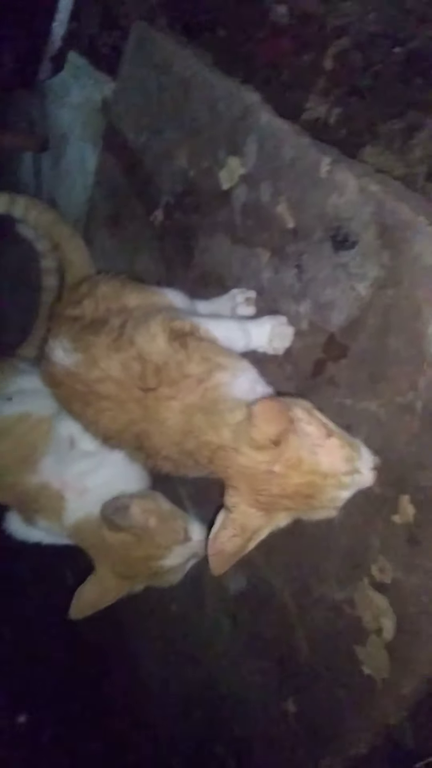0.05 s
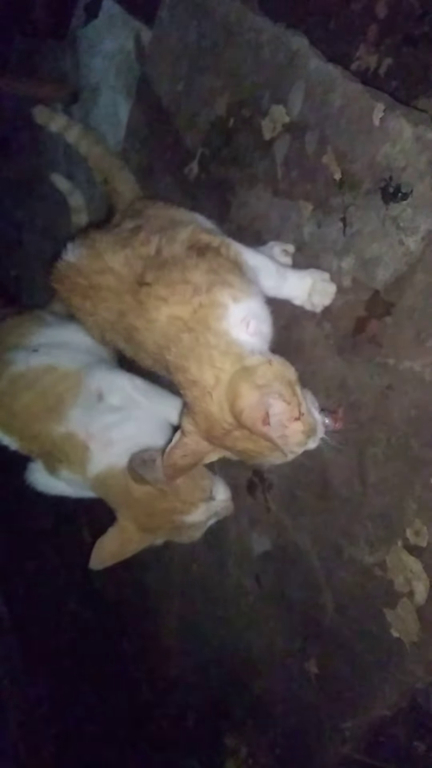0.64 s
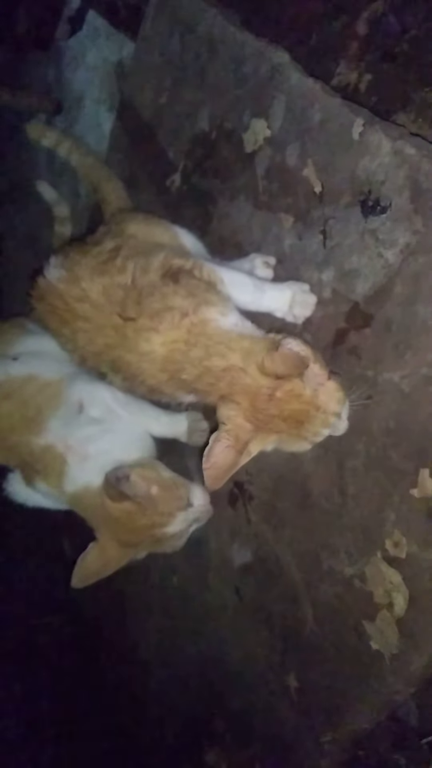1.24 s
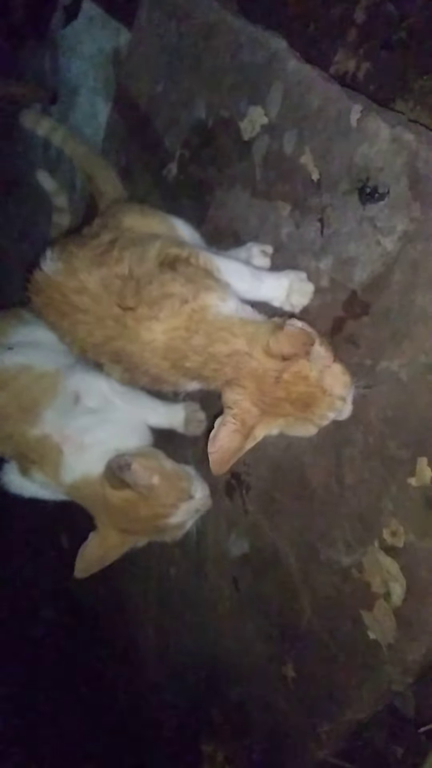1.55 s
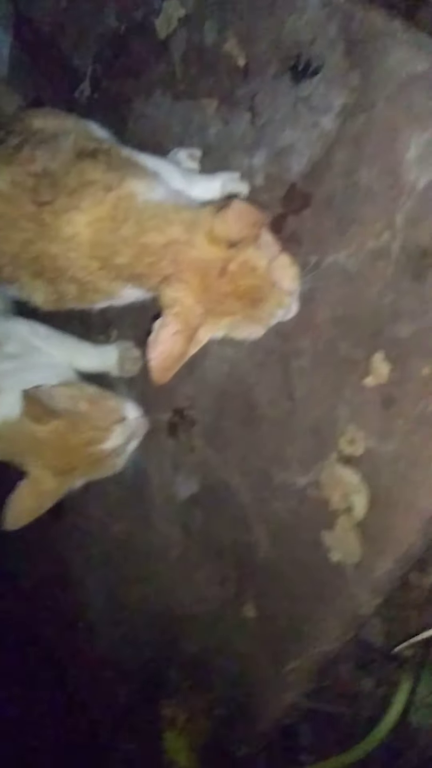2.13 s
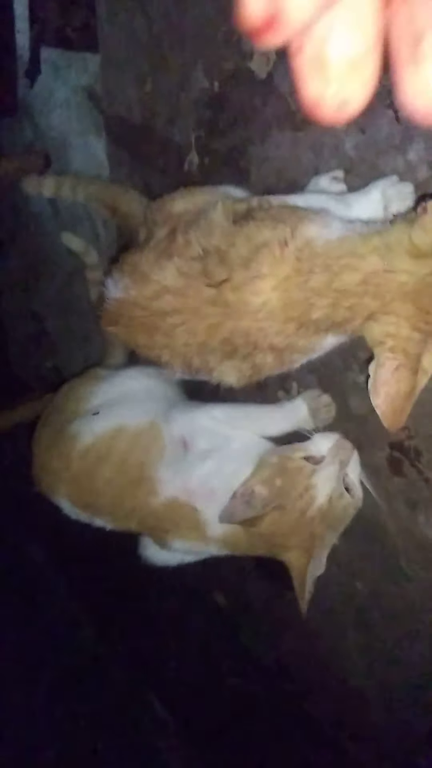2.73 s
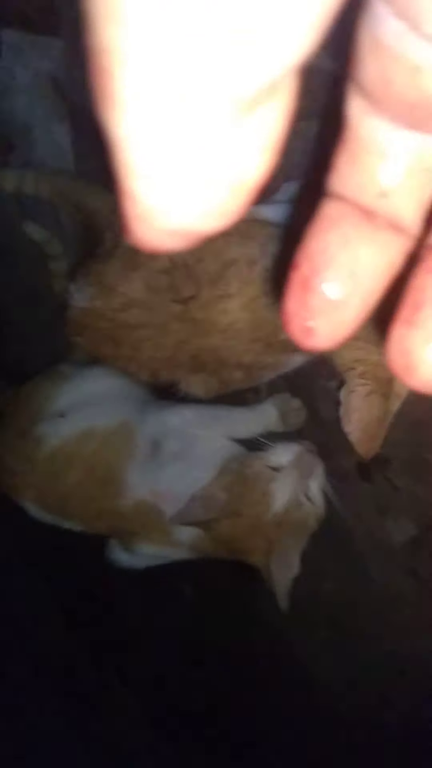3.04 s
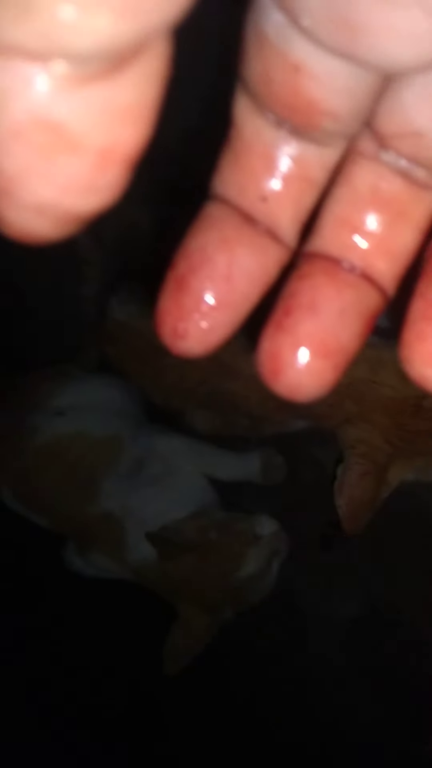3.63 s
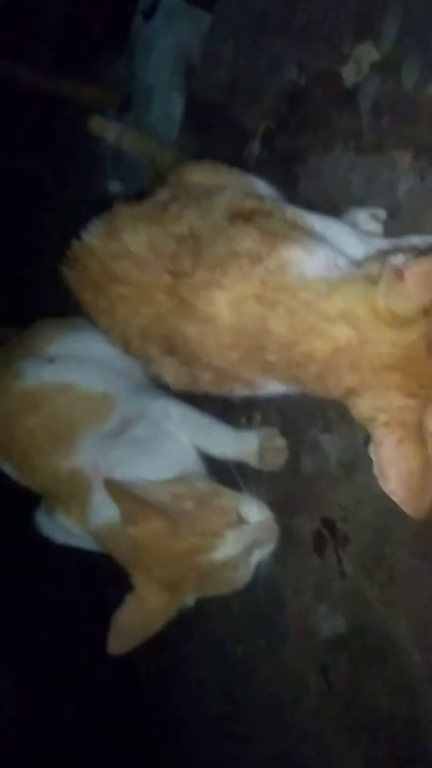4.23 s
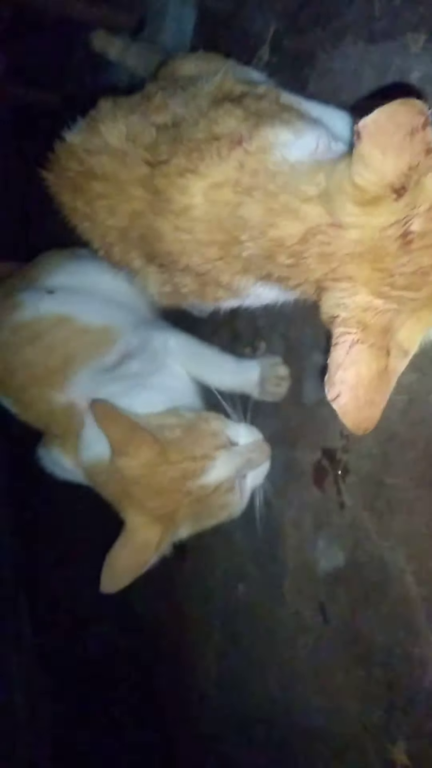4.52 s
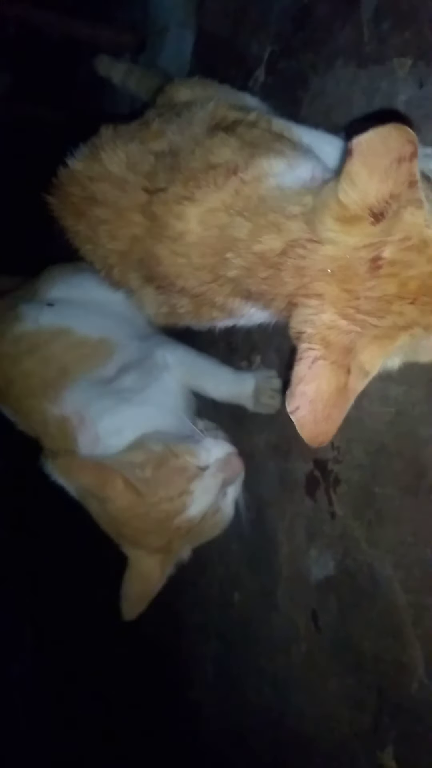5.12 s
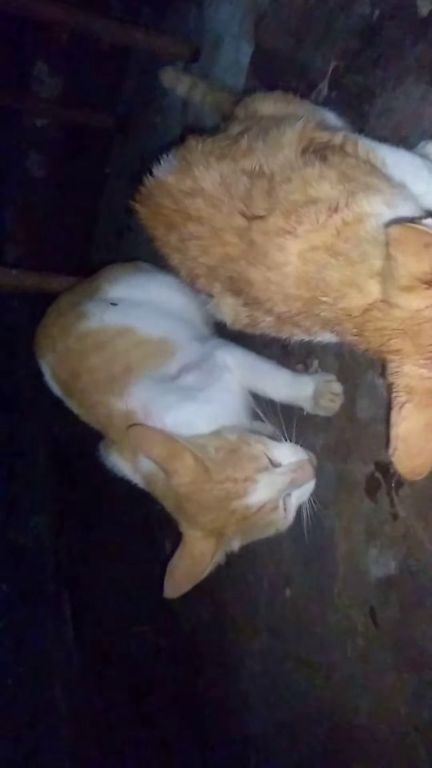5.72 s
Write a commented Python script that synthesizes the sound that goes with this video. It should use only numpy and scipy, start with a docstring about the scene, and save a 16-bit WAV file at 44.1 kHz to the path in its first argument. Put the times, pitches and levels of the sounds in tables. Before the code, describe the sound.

Outdoors at night, a high cricket chirps about nine times a second throughout, over soft air and faint hiss. Close to the phone's microphone, two cats lick and chew with tiny, irregular wet clicks and smacks, one clear at 0.2 seconds and more from 1.4 seconds on. Faint, distant two-note hoots sound in the first second and at 2.4 seconds. Short low gulps come around 1.8 and 2.7 seconds. From 2.9 to 3.1 seconds, fingers knock sharply and scuff on the phone, the loudest moment. More taps and dull, gritty rubs with a low rumble follow from 3.8 to 4.1 seconds, with a brief skin squeak near 4 seconds. From 3.9 seconds a second insect adds thin, falling ticks. Both insects grow fainter near 5 seconds, while scattered licks continue until the end, just before 6 seconds. The sound is wide in stereo.

```python
"""Outdoors at night, two cats lick and chew food from a hand close to a phone: tiny wet clicks ring in
their mouths. A cricket scrapes its wings about nine times a second, over soft air and faint far hoots.
Fingers knock, rub and squeak on the phone, and a second insect joins in with thin falling ticks.
The right channel is slightly delayed and upside down, which widens the sound.
The phone's noise suppressor lowers the quiet moments."""
import sys
import numpy as np
from scipy import signal
from scipy.fft import rfft, irfft
from scipy.io import wavfile
from scipy.ndimage import uniform_filter1d

SR = 44100
rng = np.random.default_rng(int(sys.argv[2]) if len(sys.argv) > 2 else 0)


def generate_wav(signal):
    """Clip the signal to [-1, 1] and save it as 16-bit WAV at the path in sys.argv[1]."""
    frames = np.transpose(np.atleast_2d(signal))
    scaled = np.clip(frames, -1, 1) * 32767
    pcm = np.round(scaled).astype(np.int16)
    wavfile.write(sys.argv[1], SR, pcm)


N = 254456

# strokes of skin on the phone: peak t/s, level/dB, rise/s, fall/s, grit relative to the stroke/dB
# (rise and fall are the times to grow or fade by a factor of about 2.7)
RUBS = [(2.905, -27.5, 0.0031, 0.021, -19.5), (3.048, -28, 0.0074, 0.025, -8),
        (3.069, -24, 0.0053, 0.0023, 2), (3.761, -25.5, 0.0092, 0.0093, -10),
        (3.781, -17, .014, 0.012, -13.5), (3.878, -21, .015, 0.013, -37), (3.997, -27.5, 0.0029, 0.031, -8),
        (4.027, -25.5, 0.024, 0.023, -13), (4.201, -62.5, 0.031, 0.044, 16.5)]


def undb(db):
    """Turn decibels into a factor to multiply by."""
    return 10 ** (np.asarray(db) / 20)


def unit(x):
    """Scale x to an average strength (rms) of 1."""
    return x / np.sqrt(np.mean(x ** 2) + 1e-20)


def seconds(length):
    """The time of each sample in a short sound."""
    return np.arange(int(length * SR)) / SR


def curve(points, s):
    """Read a curve of (time, value) points at the times s."""
    return np.interp(s, *np.transpose(points))


def add(out, s, x):
    """Mix x into out from time s on."""
    i = int(round(s * SR))
    x = x[..., max(-i, 0):out.shape[-1] - i]
    out[..., max(i, 0):max(i, 0) + x.shape[-1]] += x


def band(x, hz, octaves):
    """Keep the frequencies in a band around hz."""
    edges = np.clip([hz / 2 ** (octaves / 2), hz * 2 ** (octaves / 2)], 20, SR / 2 - 500)
    return signal.sosfilt(signal.butter(2, edges, "bandpass", fs=SR, output="sos"), x)


def colour(x, points):
    """Shape the bass and treble of x with (f/Hz, level/dB) points, at strength 1."""
    hz, db = np.transpose(points)
    f = np.maximum(np.fft.rfftfreq(x.shape[-1], 1 / SR), 1)
    gain = undb(np.interp(np.log(f), np.log(hz), db))
    return unit(irfft(rfft(x) * gain, x.shape[-1]))


def walk(rate):
    """A smooth random wander of size about 1, turning rate times a second."""
    hold = max(int(SR / rate), 1)
    steps = np.repeat(rng.standard_normal(N // hold + 1), hold)
    return unit(uniform_filter1d(steps, hold)[:N])


def grains(n, rate, spread_db):
    """Random tiny clicks of very unequal size, about rate a second."""
    hits = rng.random(n) < rate / SR
    return hits * rng.standard_normal(n) * undb(spread_db * rng.standard_normal(n))


def glide(length, start_hz, end_hz):
    """A tone that swells and fades while its pitch slides."""
    n = len(seconds(length))
    cycles = np.cumsum(np.linspace(start_hz, end_hz, n)) / SR + rng.random()
    return np.sqrt(np.hanning(n)) * np.sin(2 * np.pi * cycles)


def widen(x, lag_ms=.447):
    """Make wide stereo: the right channel is slightly shifted in time and upside down."""
    i = np.arange(len(x))
    shifted = np.interp(i - np.round(lag_ms * SR / 1000), i, x, left=0, right=0)
    return np.array([x, -shifted])


def echoes(x, t60, wet_db, channels=2):
    """Dense echoes from ground, walls and leaves; they fade by 60 dB in t60 seconds."""
    t = seconds(t60)
    tail = rng.standard_normal((channels, len(t))) * np.exp(-np.log(1000) * t / t60)
    tail = unit(tail * (1 - np.exp(-t / .0015))) / np.sqrt(len(t))
    return undb(wet_db) * signal.fftconvolve(x[None], tail, axes=1)[:, :len(x)]


def night(air_db=-65, hiss_db=-72, trill_hz=2970, trill_db=-80, chorus_hz=7280, chorus_db=-75):
    """Soft outdoor air, the blurred trills of far insects, and microphone hiss."""
    # tone colours of the air and the hiss: f/Hz, level/dB
    air_colour = [(40, -11.5), (100, 12), (250, 3), (600, -3), (1200, -9), (2000, -7), (3000, -13.5),
                  (4000, -10.5), (5500, -17), (9000, -23), (15000, -20)]
    hiss_colour = [(100, 2.5), (1000, -15), (5000, -.5), (10000, -3), (15000, -5.5)]
    air = undb(air_db + walk(5)) * colour(rng.standard_normal(N), air_colour)
    trill = undb(trill_db + 3.5 * walk(18)) * unit(band(rng.standard_normal(N), trill_hz, .1))
    chorus = undb(chorus_db + 3 * walk(25)) * unit(band(rng.standard_normal(N), chorus_hz, .07))
    hiss = undb(hiss_db) * colour(rng.standard_normal((2, N)), hiss_colour)
    return widen(air + trill + chorus) + hiss


def hand_rumble(hz=88, octaves=.98, rest_db=-65, shake_db=-37, brace_s=.024, settle_s=.1, left_db=1):
    """The gripping hand shakes the phone a little all the time, and more around each rub."""
    t = np.arange(N) / SR
    shake = sum(undb(db + shake_db) * np.exp(-np.maximum((s - t) / brace_s, (t - s) / settle_s))
                for s, db, *_ in RUBS)
    rumble = (undb(rest_db) + shake) * unit(band(rng.standard_normal(N), hz, octaves))
    return widen(rumble) * undb([[left_db], [-left_db]])


def hoots(gain_db=-1, hoot_s=.082, pitch_drop=.041):
    """Soft far calls of two nearly pure notes, the second lower, blurred by their echoes."""
    # far calls: t/s, pitch/Hz, level/dB, delay of the second note/s
    calls = [(-.03, 778, -64, 0.082), (.44, 528, -63.5, 0.071), (.797, 1325, -72.5, 0.0706),
             (2.362, 816.5, -62, 0.11)]
    dry = np.zeros(N)
    for s, hz, db, delay in calls:
        for start, pitch in [(s, hz), (s + delay, hz * (1 - pitch_drop))]:
            add(dry, start, undb(db + gain_db) * glide(hoot_s, pitch * 1.008, pitch * .992))
    dry *= 1 + walk(120)
    return widen(dry) + echoes(dry, t60=.25, wet_db=1)


def cricket_rhythm(first_s=.0068, uneven_db=1.1):
    """List the cricket's chirps as (t/s, level/dB), each a little louder or softer by chance."""
    # the cricket's tempo: t/s, rate/(chirps a second)
    tempo = [(0.0, 8.87), (0.55, 8.94), (0.9, 8.71), (1.15, 8.9), (2.3, 8.73), (2.7, 9.1), (3.1, 8.54),
             (4.0, 9.1), (4.3, 9.13), (4.8, 8.9), (5.77, 8.91)]
    # its loudness as the phone turns and the hand shades it: t/s, level/dB
    loudness = [(0, -50), (.3, -47), (.9, -50), (1.75, -46.5), (2.28, -57.5), (2.9, -55), (3.1, -57.5),
                (3.64, -60), (3.88, -53.5), (4.55, -50.5), (4.86, -64.5), (5.35, -60), (5.77, -59.5)]
    chirps, s = [], first_s
    while s < N / SR:
        chirps.append((s, curve(loudness, s) + uneven_db * rng.standard_normal()))
        s += 1 / curve(tempo, s)
    return chirps


def cricket(high_hz=7480, low_hz=6740, gain_db=-7, undertone_hz=2950, undertone_db=-29, clear_db=-47):
    """A wing scrapes a row of teeth and slows, so its tone falls; echoes smear strokes into a chirp."""
    # wing strokes of one chirp: t within the chirp/s, length/s, level/dB
    strokes = [(-.0245, 0.011, -3), (-.0105, .01, -6), (-.003, 0.0074, 5), (.004, 0.013, -5)]
    out = np.zeros((2, N))
    lead_s = .04  # room for the early strokes
    for s, db in cricket_rhythm():
        wings = np.zeros(SR // 2)
        for start, length, stroke_db in strokes:
            detune = 1 + .006 * rng.standard_normal()
            tone = glide(length, high_hz * detune, low_hz * detune)
            undertone_gain = undb(undertone_db + 3 * rng.standard_normal())
            undertone = undertone_gain * glide(length, undertone_hz * 1.07, undertone_hz * .93)
            add(wings, lead_s + start, undb(stroke_db + 1.2 * rng.standard_normal()) * (tone + undertone))
        # when the straight path is shaded, more of the weaker chirp is echo
        shade_db = np.clip((clear_db - db) / 2, 0, 5)
        wings += echoes(wings, t60=.11, wet_db=shade_db - 7, channels=1)[0]
        chirp = widen(wings) + echoes(wings, t60=.15, wet_db=-11)
        add(out, s - lead_s, undb(db + gain_db) * unit(chirp))
    return out


def chewing(mouth_hz=3400, octaves=1.6, bite_db=3, gain_db=-1):
    """Many tiny wet clicks ring in the mouth, swelling unevenly with the jaw."""
    # loudness of the soft chewing: t/s, level/dB
    loudness = [(0, -60), (.2, -90), (1.3, -87), (2.1, -71), (2.38, -60), (2.53, -69.5), (2.83, -57),
                (3.25, -80.5), (4.5, -76), (5, -68.5), (5.77, -80)]
    clicks = grains(N, rate=3000, spread_db=4)
    jaw = undb(curve(loudness, np.arange(N) / SR) + gain_db + bite_db * walk(25))
    dry = jaw * unit(band(clicks, mouth_hz, octaves))
    return widen(dry) + echoes(dry, t60=.11, wet_db=-12)


def licks_and_skin(rasp_db=-25, crackle_db=-84):
    """Ringing bursts of clicks with a rasp: saliva snaps on a rough tongue, or skin rubs the phone."""
    # licks and smacks, plus a skin squeak (3.981 s) and a hollow rub (4.189 s) on the phone:
    # t/s, peak level/dB, fade time/s, ring/Hz, band width/octaves
    bursts = [(.047, -48.5, 0.0049, 1900, 1.2), (0.24, -37.5, 0.011, 4700, 0.6),
              (0.342, -50.5, 0.0084, 8930, 0.15), (1.36, -53.5, 0.076, 2410, 0.22),
              (1.562, -47.5, 0.025, 4180, 0.63), (1.583, -48.5, 0.009, 4000, .45),
              (1.6, -52.5, .04, 3770, 1.3), (1.705, -45, 0.02, 2920, 3.4), (1.856, -50.5, 0.025, 3000, 1.9),
              (2.157, -48, 0.0016, 2530, .38), (2.179, -42.5, 0.0014, 2300, 0.39),
              (2.284, -46, 0.0077, 2900, 1), (2.374, -49, .0026, 2880, 1.15),
              (2.409, -43, 0.0028, 4780, 0.38), (2.446, -38.5, 0.0056, 2210, 1.16),
              (2.596, -51, 0.025, 4500, 1.4), (2.763, -41.5, 0.021, 2120, 0.69),
              (2.773, -50.5, 0.0089, 4340, 1.5), (3.219, -50, 0.022, 2920, 0.88),
              (3.31, -48, 0.012, 4100, 1.3), (3.405, -46.5, 0.0032, 2140, 0.22),
              (3.446, -47, 0.0081, 2500, 0.14), (3.551, -38, 0.013, 3480, 0.67),
              (3.981, -28, .006, 3000, 0.97), (4.189, -49, 0.028, 867, 0.22),
              (4.443, -49.5, 0.0036, 4730, 0.45), (4.556, -47, 0.039, 3100, 1.24),
              (5.146, -44.5, .014, 1852, 0.57), (5.414, -59.5, 0.048, 1946, 0.81),
              (5.526, -55.5, 0.0093, 675, 0.89), (5.727, -44.5, 0.0051, 8800, 0.58),
              (5.73, -51, 0.02, 3330, 0.88)]
    dry = np.zeros(N)
    t = seconds(.3) - .1  # zero at the peak of a burst
    for s, db, fade_s, hz, octaves in bursts:
        swell = np.exp(np.where(t < 0, t / (.15 * fade_s), -t / fade_s))
        snaps = swell * grains(len(t), rate=2600, spread_db=6)
        snaps[np.argmin(np.abs(t))] = 1.7 * np.abs(snaps).max()  # one main snap stands out
        rasp = undb(rasp_db) * np.exp(-np.abs(t) / .011) * grains(len(t), rate=4000, spread_db=5)
        burst = band(snaps + rasp, hz, octaves)
        peak = np.sqrt(uniform_filter1d(burst ** 2, size=90).max())
        add(dry, s + t[0], undb(db) * burst / peak)
    # a faint wet crackle goes on between the licks
    crackle = grains(N, rate=60, spread_db=6)
    dry += undb(crackle_db + 3 * walk(2.3)) * unit(band(crackle, hz=4300, octaves=1.3))
    return widen(dry) + echoes(dry, t60=.11, wet_db=-12)


def gulps(gain_db=4, waver=.19):
    """Swallowing makes short, low, unsteady tones in a cat's throat."""
    # swallows: t/s, length/s, pitch/Hz, level/dB
    swallows = [(1.784, 0.022, 241.6, -54), (1.915, 0.041, 222.4, -60.5), (2.668, 0.069, 209, -43.5),
                (2.746, 0.05, 207, -51)]
    dry = np.zeros(N)
    for s, length, hz, db in swallows:
        n = len(seconds(length))
        phase = 2 * np.pi * np.cumsum(hz * (1 + waver * walk(251)[:n])) / SR
        tone = np.sin(phase) + .018 * np.sin(2 * phase)
        add(dry, s, undb(db + gain_db) * np.sqrt(np.hanning(n)) * tone)
    return widen(dry)


def knocks(snap_db=-22):
    """A fingertip makes the case ring; a shorter touch clicks more sharply, with more snap of skin."""
    # finger taps: t/s, peak level/dB, contact time/ms, lag of the right channel/ms
    taps = [(2.896, -39.5, .5, 0.48), (2.9006, -25, 1.3, 0.58), (2.926, -3.5, 0.38, -0.39),
            (3.0152, -19.5, 0.24, 0.42), (3.0582, -12, 1.87, 0.47), (3.068, -10, 3.6, 0.41),
            (3.0689, -8.5, 0.02, 0.5), (3.782, -19.5, .3, 0.81), (3.8237, -27.5, .2, 0.38),
            (3.9231, -22, .5, 0.44), (4.087, -31, .4, 0.61)]
    # ringing tones of the phone's case: f/Hz, time to fade by 60 dB/s, level/dB
    case_tones = [(189, 0.026, -22), (600, 0.0052, -5.5), (1450, 0.0025, 5.5), (3365, 0.0013, -5),
                  (5640, 0.004, 7.5)]
    out, t = np.zeros((2, N)), seconds(.03)
    ring = sum(undb(db) * np.sin(2 * np.pi * hz * t) * np.exp(-np.log(1000) * t / t60)
               for hz, t60, db in case_tones)
    pad = SR // 500
    for s, db, contact_ms, lag_ms in taps:
        push = np.hanning(int(contact_ms * SR / 1000) + 3)
        knock = np.pad(np.convolve(ring, push), pad)
        # the case springs back, so a push leaves no lasting pressure
        knock = signal.sosfilt(signal.butter(1, 260, "highpass", fs=SR, output="sos"), knock)
        knock /= np.abs(knock).max()
        snap = band(rng.standard_normal(len(t)) * np.exp(-t / .0005), hz=7000, octaves=1.6)
        add(knock, pad / SR, undb(snap_db) * snap / (1 + contact_ms ** 2))
        add(out, s - pad / SR, widen(-undb(db) * knock, lag_ms))
    return out


def rubs(body_db=-1, left_db=1):
    """Skin sticks and slips on the case: a dull run of slips with fine grit on top."""
    # tone colour of the dull slips: f/Hz, level/dB
    slip_colour = [(40, -21), (100, 1), (200, -2), (420, 0), (700, -8.5), (1200, -12.5), (1700, -13.5),
                   (2800, -16), (4500, -26), (7500, -34.5), (11000, -48), (15000, -46.5)]
    # tone colour of the fine grit: f/Hz, level/dB
    grit_colour = [(600, -19.5), (1500, -11.5), (2900, -6.5), (5000, -9.5), (7500, -10.5), (11000, -22),
                   (15500, -28)]
    t = np.arange(N) / SR
    slip_power, grit_power = np.zeros(N), np.zeros(N)
    for s, db, rise, fall, grit_db in RUBS:
        from_peak = np.maximum((s - t) / rise, (t - s) / fall)
        power = undb(db) ** 2 * np.exp(-2 * np.minimum(from_peak, 20))
        slip_power += power
        grit_power += power * undb(grit_db) ** 2
    slips = np.sqrt(slip_power) * colour(grains(N, rate=9000, spread_db=2.5), slip_colour)
    grit = np.sqrt(grit_power) * colour(grains(N, rate=3000, spread_db=5), grit_colour)
    dry = undb(body_db) * slips + grit
    return (widen(dry) + echoes(dry, t60=.49, wet_db=-22.5)) * undb([[left_db], [-left_db]])


def ticking_insect(high_hz=6500, low_hz=5750, gain_db=-1, tick_s=.016, period_s=.1084):
    """A second insect makes one short falling stroke at a time, roughened by echoes."""
    # runs of even ticks, with a short hitch between them: start t/s, end t/s
    runs = [(3.909, 4.5), (4.585, 5.28), (5.362, 5.52), (5.6, 5.65)]
    # loudness of the ticks: t/s, level/dB
    loudness = [(3.9, -47), (4.13, -54.5), (4.44, -42.5), (4.92, -59.5), (5.25, -56.5), (5.77, -57)]
    dry = np.zeros(N)
    for start, end in runs:
        for s in np.arange(start, end, period_s):
            add(dry, s - tick_s / 2, undb(curve(loudness, s) + gain_db) * glide(tick_s, high_hz, low_hz))
    dry *= np.abs(1 + .55 * walk(700))
    return widen(dry) + echoes(dry, t60=.06, wet_db=-5)


def scene():
    """All the sounds together, in stereo."""
    return (cricket() + ticking_insect() + licks_and_skin() + chewing() + gulps() + hoots()
            + rubs() + knocks() + hand_rumble() + night())


def record(dry, quiet_db=-50, bass_cut_db=11, treble_cut_db=4, split_hz=350, top_hz=15800):
    """The phone loses deep bass and top treble; its suppressor turns quiet moments down, bass most."""
    heard = signal.sosfilt(signal.butter(2, [36, 14500], "bandpass", fs=SR, output="sos"), dry)
    power = uniform_filter1d(np.mean(heard ** 2, axis=0), size=600)
    above_quiet_db = 10 * np.log10(np.maximum(power, 1e-12)) - quiet_db
    bass = signal.sosfiltfilt(signal.butter(1, split_hz, fs=SR, output="sos"), heard)
    bass_gain = undb(np.clip(above_quiet_db, -bass_cut_db, 0))
    treble_gain = undb(np.clip(above_quiet_db, -treble_cut_db, 0))
    cleaned = bass * bass_gain + (heard - bass) * treble_gain
    return signal.sosfilt(signal.ellip(10, .2, 80, top_hz, fs=SR, output="sos"), cleaned)


dry = scene()
out = record(dry)
generate_wav(out)
```